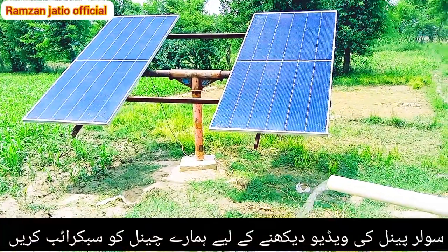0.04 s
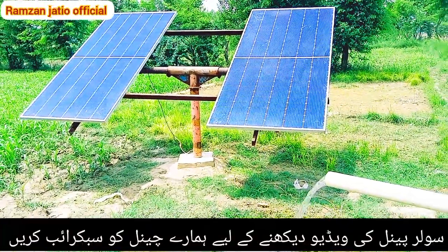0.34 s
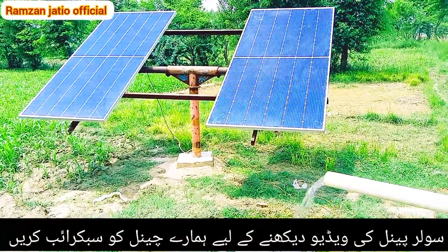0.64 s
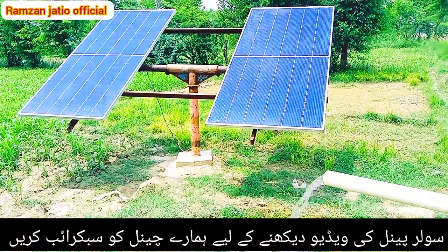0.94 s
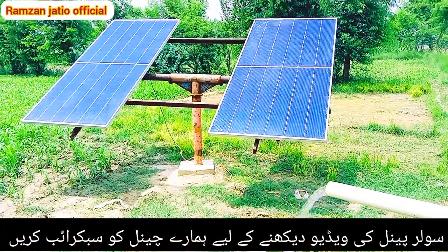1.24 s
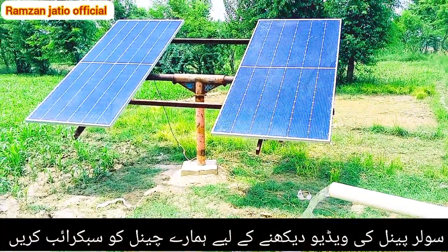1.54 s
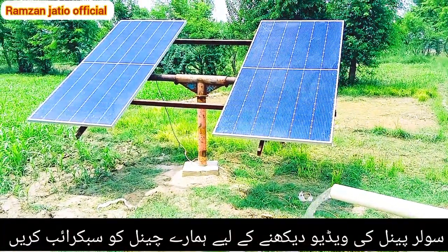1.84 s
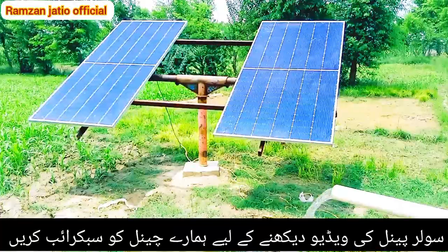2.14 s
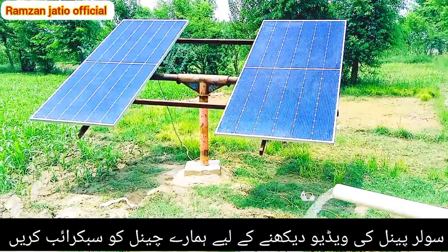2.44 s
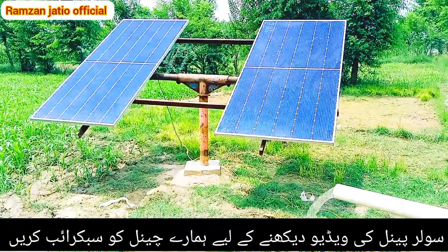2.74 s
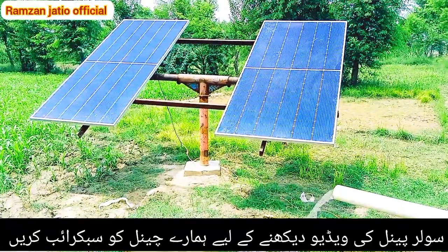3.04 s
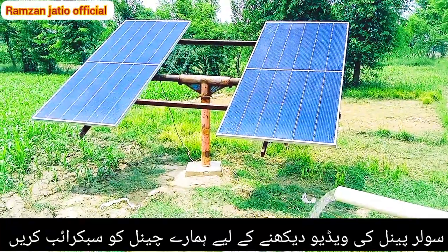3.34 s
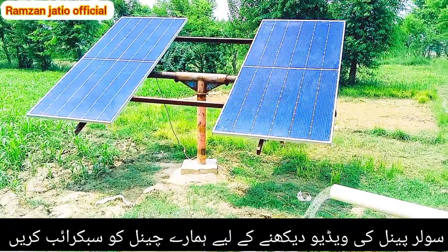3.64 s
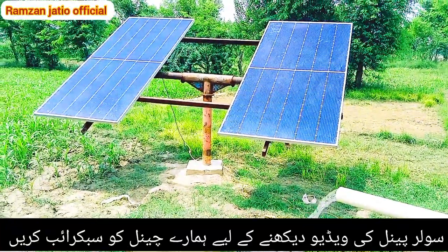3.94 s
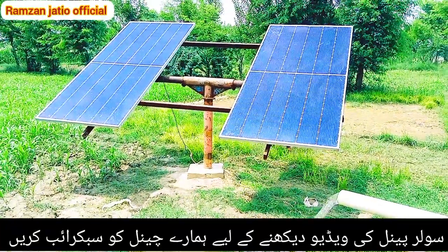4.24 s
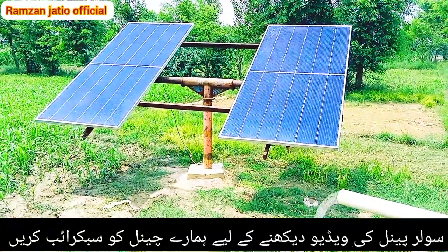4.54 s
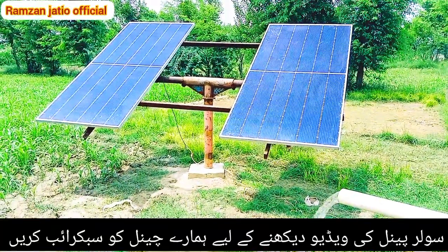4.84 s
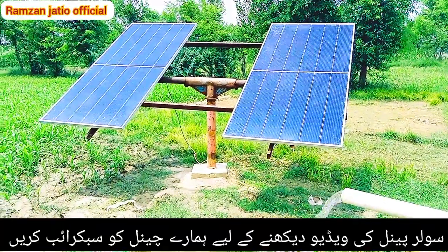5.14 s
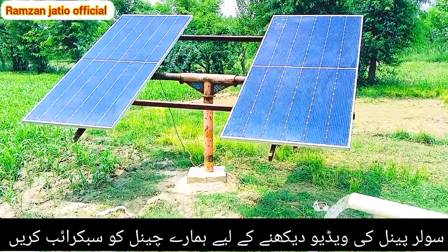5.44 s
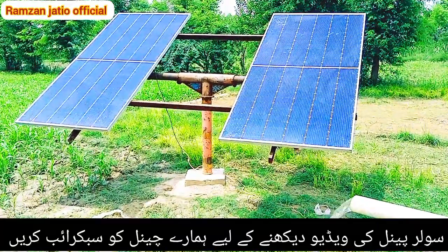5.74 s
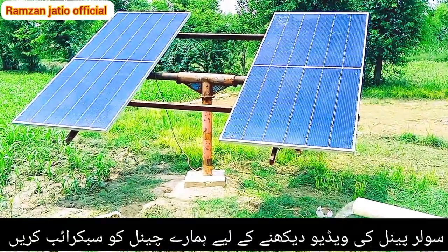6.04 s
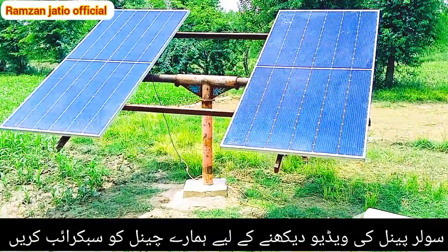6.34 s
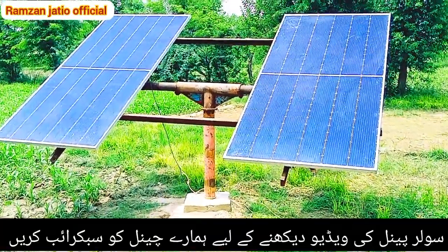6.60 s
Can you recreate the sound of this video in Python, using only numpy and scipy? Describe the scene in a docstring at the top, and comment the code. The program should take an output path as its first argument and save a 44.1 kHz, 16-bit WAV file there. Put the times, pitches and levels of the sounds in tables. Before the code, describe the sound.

A close jet of water pours from a pipe outdoors, fizzing, splashing and gurgling, with a single light knock early on.

```python
"""Water gushes from a pump pipe into a channel, close up in an open field: a bright, surging splash.
Spray and drops fizz on top while the jet drags air under, where it gurgles, plops and once glugs.
Lumps of water slap down, and there is one light knock. Reflections hollow out the water's tone and
shift as the hand-held microphone moves. Soft low thumps come from wind and a few deep gulps of water."""
import sys
import numpy as np
from scipy import signal
from scipy.fft import rfft, irfft, next_fast_len
from scipy.io import wavfile
from scipy.ndimage import uniform_filter1d

SR = 44100
rng = np.random.default_rng(int(sys.argv[2]) if len(sys.argv) > 2 else 0)


def file_out(sig):
    """Save sig as 16-bit WAV at sys.argv[1]."""
    # one column per channel
    cols = np.atleast_2d(sig).T
    # limit, then scale
    lim = np.clip(cols, -1, 1)
    pcm = np.round(lim * 32767).astype(np.int16)
    wavfile.write(sys.argv[1], SR, pcm)


N = 298557
T = np.arange(N) / SR

# Tone of the open air. Each row: frequency in Hz, relative level in dB.
AIR_SPECTRUM = [(15, -43), (80, -25.5), (160, -2), (260, 1), (400, -4), (1500, -29), (8000, -51)]
# Tone of the low rumble. Each row: frequency in Hz, relative level in dB.
RUMBLE_SPECTRUM = [(15, -10), (40, -6.5), (75, 2), (130, 0), (220, -11), (400, -28), (1000, -78)]
# Soft low thumps, from wind on the microphone and a few faint deep gulps of water.
# Each row: centre in seconds, level in dB, pitch in Hz, half length in seconds.
LOW_THUMPS = [(0.045, -48, 75.5, 0.029), (0.295, -38.5, 93.8, 0.022), (0.47, -60, 112, 0.019),
              (0.56, -47.5, 74.6, 0.029), (0.67, -60.5, 66, 0.05), (1.01, -60.5, 254, 0.011),
              (1.157, -52.5, 76.4, 0.016), (1.715, -65, 85, 0.072), (4.43, -68, 183, 0.038),
              (5.52, -58.5, 145, 0.0091), (6.057, -65, 171, 0.061), (6.478, -58, 70.7, 0.018),
              (6.725, -63, 150, 0.013)]
# The knock's ring. Each row: frequency in Hz, relative level in dB, seconds to fall by 60 dB.
KNOCK_RING = [(1670, -21, 0.023), (3130, -20, .01), (4050, -11, 0.014), (6000, 0, 0.0093),
              (6850, 4.5, 0.0065), (7270, -9, 0.013), (11750, -4, .008), (12450, -4, 0.011),
              (13370, -5, .007), (14700, -8, .008)]
# Tone of the water at the microphone. Each row: frequency in Hz, relative level in dB.
WATER_EQ = [(200, -20.5), (380, -9), (540, -9), (1100, -12), (1600, -10), (3500, -9), (4400, -12),
            (5600, -2), (6500, 1), (7300, -6.5), (8500, -18.5), (10500, -21.5), (12200, -8), (14000, -15),
            (15300, -11)]
# Notches cut by reflections at each microphone position. Each row: centre in Hz, width in Hz, gain in dB.
FIRST_NOTCHES = [(348, 129, -11), (825, 120, -5.5), (1370, 150, -8.5), (1892, 106, -19.5),
                 (2410, 143, -8.5), (2870, 170, -3.5), (4900, 250, -10)]
SECOND_NOTCHES = [(355, 127, -9), (907, 100, -8.5), (1398, 165, -11.5), (1888, 86, -8), (2480, 97, -9),
                  (2755, 108, -12), (4017, 260, -7.5)]
# The microphone's move. Each row: time in seconds, share of the way to the second position.
MIC_MOVE = [(3.6, 0.039), (4.1, 1)]
# Lumps of water landing. Each row: start in seconds, relative level in dB, length in seconds.
WATER_SLAPS = [(1.049, -37, 0.0013), (1.05, -36, 0.0078), (1.851, -34.5, 0.0017), (2.365, -46, 0.0035),
               (3.557, -34.5, 0.0016), (4.058, -36, 0.002), (4.145, -35.5, 0.0021), (4.892, -33.5, 0.0025),
               (5.176, -36, 0.005), (5.209, -33.5, 0.002), (5.233, -35, 0.0058), (5.276, -35, 0.0045),
               (5.285, -35, 0.003), (5.551, -41, .001), (5.6118, -31, 0.0012), (6.027, -34.5, 0.0057),
               (6.059, -35.5, 0.005), (6.062, -46, 0.0025)]
# Big lone bubbles, plus two dull lumps of water landing (1.651 and 2.249 s), made as very short bubbles. Each
# row: start in seconds, relative level in dB, pitch in Hz, decay time in cycles.
BUBBLE_PLOPS = [(.081, -34.5, 1040, 6), (.143, -40, 675, 6.6), (0.691, -38.5, 980, 6.7),
                (1.651, -37, 1090, 2.1), (1.715, -44.5, 526, 3.7), (1.82, -34, 2780, 5),
                (2.249, -32, 1170, 3.2), (2.682, -46, 580, 4.5), (2.73, -45, 635, 4.6),
                (2.802, -39.5, 1050, 6.9), (3.158, -42.5, 1010, 6), (3.939, -44, 714, 5),
                (4.294, -40, 1150, 5.6), (5.689, -37.5, 1020, 5.8), (5.716, -30.5, 997, 6.1)]
# One shrinking air pocket. Each row: time in seconds, level in dB, pitch in Hz.
GLUG_SWEEP = [(2.535, -84, 400), (2.555, -66, 427), (2.595, -55.5, 497), (2.65, -60.5, 724),
              (2.69, -55, 880), (2.8, -63, 960), (2.83, -80, 1100)]
# Resonances of the hollow that the jet digs. Each row: centre in Hz, width in Hz.
HOLLOW_MODES = [(585, 47), (684, 22.5), (1050, 38)]
# Big gulps of air. Each row: start and length in seconds, relative deep and high gurgle levels in dB.
AIR_GULPS = [(0.107, 0.1, -56, -65), (0.566, 0.11, -57, -59), (0.751, 0.071, -53.5, -69),
             (.84, 0.069, -62, -52.5), (0.937, 0.049, -54, -65), (1.15, 0.045, -54.5, -62),
             (1.266, 0.21, -68, -64), (1.587, .14, -55.5, -77), (1.732, 0.047, -69, -57.5),
             (1.928, 0.2, -58.5, -56.5), (2.143, .14, -67, -56), (2.416, 0.062, -60, -58),
             (2.638, 0.12, -56.5, -64), (2.84, 0.077, -56, -63), (3.07, 0.1, -59.5, -65),
             (3.316, 0.067, -59.5, -74), (3.427, .1, -68, -61), (3.7, 0.13, -56.5, -70),
             (3.823, 0.059, -60, -51.5), (3.93, 0.08, -53.5, -60), (4.266, 0.17, -58.5, -74),
             (4.542, 0.14, -54.5, -58.5), (4.7, 0.23, -67, -60), (4.983, 0.17, -57, -64),
             (5.166, 0.091, -56, -61), (5.394, 0.15, -59, -58), (5.583, 0.23, -55.5, -61),
             (5.85, 0.055, -55, -53), (6.01, .06, -61, -77), (6.19, 0.081, -54, -58),
             (6.41, 0.074, -77, -60), (6.49, 0.048, -55, -80)]
# Lulls in the bubbling. Each row: centre and half length in seconds, dip of the deep simmer in dB.
SIMMER_STALLS = [(1.547, 0.062, -13), (3.002, 0.024, -18), (3.24, .04, -20)]
# Slow drift of the jet. Each row: time in seconds, level in dB above its usual strength.
JET_DRIFT = [(0, -0.1), (.5, -0.65), (.88, .6), (1.13, -0.3), (1.9, -0.65), (2.5, 0), (3.62, 0), (3.8, 1),
             (4.2, 0.7), (5.2, 0.23), (6.45, 0.5), (6.77, -0.8)]
# Brief spurts and sags of the jet. Each row: centre and half length in seconds, level change in dB.
JET_SPURTS = [(.88, .03, 2), (1.051, .012, 3.5), (1.476, 0.029, -3.5), (1.546, 0.034, -3),
              (1.645, 0.021, 2.5), (2.075, 0.03, 1.9), (2.14, .02, -3), (2.192, 0.018, 2.2),
              (2.245, 0.011, 3), (2.32, 0.028, -1), (2.717, 0.023, 3), (3.88, .025, 2), (5.347, .02, -2.2),
              (5.513, 0.017, 2.5), (6.364, .035, -3), (6.454, .035, 1.4)]

AIR_DB, RUMBLE_DB = -81.5, -85
WAKE_DB, WAKE_LENGTHS = -18, 2.2  # each thump comes with a weaker, longer rumble
KNOCK_S, KNOCK_DB = 1.5059, -22
SIMMER_DEEP_DB, SIMMER_HIGH_DB, SIMMER_WAVER_DB = -61.5, -63, 3  # on the same scale as the gulps
GULP_RISE_S, GULP_FADE_S = .02, .018
SPLASH_DB, PATTER_DB = -45, -54  # at the jet's usual strength
PATTER_FOLLOWS = 1.6  # dB of patter per dB of the jet
HIGH_CUT_HZ = 15580


def gain_of(db):
    """Decibels to gain."""
    return 10 ** (np.asarray(db) / 20)


def unit_rms(x):
    """Scales to rms 1."""
    return x / np.sqrt(np.mean(x ** 2) + 1e-20)


def steadied(x):
    """A leveller: evens out swings slower than about 40 ms."""
    x = unit_rms(x)
    power = uniform_filter1d(uniform_filter1d(x ** 2, size=1500), size=1000)
    return unit_rms(x / np.sqrt(abs(power) + 0.19))


def eq_db(points, hz):
    """An EQ curve in dB, its points joined on a log-frequency axis."""
    point_hz, db = np.transpose(points)
    return np.interp(np.log(hz + 1), np.log(point_hz), db)


def automation(rows, column=1):
    """One column of a timed table, drawn out to every sample."""
    rows = np.array(rows)
    return np.interp(T, rows[:, 0], rows[:, column])


def bump(centre_s, half_length):
    """A bell-shaped envelope."""
    return np.exp(-np.minimum(((T - centre_s) / half_length) ** 2, 50))


def add(mix, start_s, sound):
    """Drops a sound into the mix."""
    part = mix[max(round(start_s * SR), 0):][:len(sound)]
    part += sound[:len(part)]


def band(x, lo_hz, hi_hz, order=3):
    """Band-pass."""
    sos = signal.butter(order, [lo_hz, min(hi_hz, .49 * SR)], "band", fs=SR, output="sos")
    return signal.sosfilt(sos, x)


def resonate(x, hz, width_hz):
    """A resonance of gain 1 at a steady or moving pitch."""
    turn = np.exp(2j * np.pi * np.cumsum(hz * np.ones(N)) / SR)
    pole = np.exp(-np.pi * width_hz / SR)
    return 2 * (turn * signal.lfilter([1 - pole], [1, -pole], x / turn)).real


def noise(spectrum):
    """Noise of rms 1 with the given spectrum."""
    size = next_fast_len(N)
    gains = gain_of(eq_db(spectrum, np.fft.rfftfreq(size, 1 / SR)))
    return unit_rms(irfft(rfft(rng.standard_normal(size)) * gains, size)[:N])


def flutter(lo_hz, hi_hz):
    """Soft-clipped random wavering of rms 1 between two rates."""
    sos = signal.butter(2, [lo_hz, hi_hz], "band", fs=1000, output="sos")
    slow = signal.sosfilt(sos, rng.standard_normal(8000))
    waver = np.interp(T, np.arange(8000) / 1000 - 1, slow)  # a second of pre-roll settles the filter
    return unit_rms(np.tanh(unit_rms(waver) / 2))


def impacts(per_s, spread_db):
    """Random clicks: many small, a few large."""
    size = gain_of(spread_db * np.minimum(rng.exponential(1, N), 4))
    return unit_rms(size * rng.choice([-1, 1], N) * (rng.random(N) < per_s / SR))


def low_end():
    """Wind on the microphone and a few deep water gulps thump and rumble over a bed of open air."""
    thumps = np.zeros(N)
    rumble_gain = gain_of(RUMBLE_DB + 3.8 * flutter(3.9, 7))
    turbulence = steadied(band(noise(RUMBLE_SPECTRUM), 35, 135)) / 4
    for centre, db, hz, half_length in LOW_THUMPS:
        tone = np.sin(2 * np.pi * (hz * T + rng.random()))
        thumps += gain_of(db) * bump(centre, half_length) * (tone + turbulence)
        rumble_gain += gain_of(db + WAKE_DB) * bump(centre, WAKE_LENGTHS * half_length)
    rumble = rumble_gain * noise(RUMBLE_SPECTRUM)
    air = noise(AIR_SPECTRUM) * gain_of(AIR_DB + 4.7 * flutter(4.9, 12.8))
    return thumps + rumble + air


def knock():
    """One light, hard knock: a broad crack and a ring that dies within milliseconds."""
    t, out = np.arange(SR // 10) / SR, np.zeros(N)
    ring = sum(gain_of(db - 60 * t / t60) * np.sin(2 * np.pi * (hz * t + rng.random()))
               for hz, db, t60 in KNOCK_RING)
    crack = band(rng.choice([-1., 1.], len(t)), 1400, 7500) * np.exp(-t / .002)
    hit = (ring + crack / 2) * (1 - np.exp(-t / .0004))
    add(out, KNOCK_S, gain_of(KNOCK_DB) * hit / abs(hit).max())
    return out


def reflections(notches, size=4096):
    """Impulse response from the water to one microphone position, notched by reflections."""
    hz = np.fft.rfftfreq(size, 1 / SR)
    notch_db = sum(depth * np.exp(-((hz - centre) / width) ** 2) for centre, width, depth in notches)
    db = eq_db(WATER_EQ, hz) + notch_db
    log_gain = np.log(gain_of(np.r_[db, db[-2:0:-1]]))
    minimum_phase = np.exp(np.conj(signal.hilbert(log_gain)))
    taps = np.fft.ifft(minimum_phase).real[:size // 2]
    return taps / np.linalg.norm(taps)


def at_mic(x):
    """The microphone moves, crossfading the water from one set of reflections to the other."""
    first = signal.oaconvolve(x, reflections(FIRST_NOTCHES))[:N]
    second = signal.oaconvolve(x, reflections(SECOND_NOTCHES))[:N]
    return first + automation(MIC_MOVE) * (second - first)


def slaps():
    """Each lump of water lands as a brief burst of impacts."""
    out = np.zeros(N)
    for start, db, length in WATER_SLAPS:
        age = np.arange(2000) / SR / length
        envelope = (1 - np.exp(-age / 0.21)) * np.exp(-age ** 2)  # attack: a fifth of the length
        add(out, start, gain_of(db) * envelope * rng.choice([-1, 1], len(age)))
    return gain_of(2.5) * at_mic(band(out, 1050, 15000, order=1))


def bubble(hz, cycles, rise):
    """A pocket of air rings down, its pitch rising as it nears the surface."""
    age = np.arange(int(6 * cycles / hz * SR) + 2) / SR * hz / cycles  # in decay times
    envelope = (1 - np.exp(-2 * age * cycles)) * np.exp(-age)
    return envelope * np.sin(2 * np.pi * cycles * (age + rise * age ** 2 / 2))


def swarm(lo_hz, hi_hz, per_s, spread_db, cycles, rise, sizes=12):
    """Bubbles of many sizes, each size born at its own random moments."""
    out = np.zeros(N)
    for hz in np.geomspace(lo_hz, hi_hz, sizes):
        births = impacts(per_s / sizes, spread_db)
        out += np.sqrt(hz) * unit_rms(signal.oaconvolve(births, bubble(hz, cycles, rise))[:N])
    return unit_rms(out)


def plops():
    """Now and then one large bubble rings out above the rest, and twice a dull lump of water lands with a
    short, broad thud."""
    out = np.zeros(N)
    for start, db, hz, cycles in BUBBLE_PLOPS:
        add(out, start, gain_of(db) * bubble(hz, cycles, rise=0.027))
    return at_mic(out)


def glug():
    """Impacts ring an air pocket whose pitch climbs as it shrinks."""
    pitch_hz = automation(GLUG_SWEEP, column=2)
    pocket = steadied(resonate(impacts(per_s=900, spread_db=2.5), pitch_hz, width_hz=80))
    gate = (T > GLUG_SWEEP[0][0]) & (T < GLUG_SWEEP[-1][0])
    return gate * gain_of(automation(GLUG_SWEEP)) * band(pocket, 320, 1900)


def gulping():
    """Envelopes of the deep and high gurgle: big gulps over a restless simmer that sometimes stalls."""
    stall_db = sum(db * bump(centre, half_length) for centre, half_length, db in SIMMER_STALLS)
    deep_power = gain_of(SIMMER_DEEP_DB + stall_db + SIMMER_WAVER_DB * flutter(2.75, 12)) ** 2
    high_power = gain_of(SIMMER_HIGH_DB + 0.23 * stall_db + SIMMER_WAVER_DB * flutter(1.5, 8.9)) ** 2
    for start, length, deep_db, high_db in AIR_GULPS:
        age = T - start
        attack = np.clip(age / GULP_RISE_S + .5, 0, 1)
        release = np.exp(-np.maximum(age - length, 0) / GULP_FADE_S)
        deep_power += (gain_of(deep_db) * attack * release) ** 2
        high_power += (gain_of(high_db) * attack * release) ** 2
    return np.sqrt(deep_power), np.sqrt(high_power)


def gurgle(surge):
    """The jet drags air under in gulps: short-lived bubbles ring, and so does the hollow in the water."""
    wander = 1 + 0.038 * flutter(2.3, 7.9)  # the hollow keeps changing shape, bending its pitches
    low, middle, top = (unit_rms(resonate(impacts(per_s=150, spread_db=1.5), hz * wander, width))
                        for hz, width in HOLLOW_MODES)
    large = swarm(480.6, 837, per_s=90, spread_db=2.0, cycles=8.7, rise=0.036)
    small = swarm(890.6, 1343, per_s=90, spread_db=1.5, cycles=16.2, rise=0.043)
    tilt_db = 4 * flutter(3.8, 8.3)  # the two lower resonances trade the lead
    ring = gain_of(tilt_db) * low + gain_of(-tilt_db) * middle
    deep_gain, high_gain = gulping()
    deep = deep_gain * steadied(at_mic(band(large + gain_of(-4) * ring, 310, 1260, order=2)))
    high = high_gain * steadied(at_mic(band(small + gain_of(-2.5) * top, 670, 2100, order=2)))
    return (deep + high) * gain_of(0.18 * surge + 1.1 * flutter(5.5, 11.7) - 3.9)


def jet_db():
    """Strength of the jet: a slow drift with brief spurts and sags."""
    spurts = sum(db * bump(centre, half_length) for centre, half_length, db in JET_SPURTS)
    return automation(JET_DRIFT) + spurts


def shatter(per_s, spread_db, decay_s):
    """Drops shatter, each a sudden hiss that dies away."""
    power = signal.lfilter([1], [1, -np.exp(-1 / (decay_s * SR))], impacts(per_s, spread_db) ** 2)
    return unit_rms(np.sqrt(power) * rng.standard_normal(N))


def patter(surge):
    """The midrange: coarse drops smack the surface and trap bubbles, over a smooth rush."""
    drops = shatter(per_s=600, spread_db=2.5, decay_s=0.0016)
    rush = gain_of(-1.5) * rng.standard_normal(N)
    bubbles = gain_of(-6.5) * swarm(1406.4, 4348, per_s=900, spread_db=1.8, cycles=20, rise=0.02, sizes=24)
    blips = gain_of(-12) * swarm(1205, 2420, per_s=50, spread_db=2.5, cycles=7.5, rise=0.027)
    water = band(drops + rush + bubbles + blips, 1177, 4440, order=5)
    water *= gain_of(0.92 * surge + 0.95 * flutter(3.3, 23))
    return gain_of(PATTER_DB + PATTER_FOLLOWS * jet_db()) * unit_rms(at_mic(water))


def splash(surge):
    """The bright top: fine spray, shattering drops and tiny fizzing bubbles, all arriving in clumps."""
    spray = gain_of(6.5) * rng.standard_normal(N)
    drops = shatter(per_s=440, spread_db=4.5, decay_s=0.0011)
    fizz = gain_of(-5.5) * swarm(4577, 8075, per_s=1500, spread_db=2.5, cycles=15, rise=0.0056)
    mist = band(shatter(per_s=80, spread_db=3.5, decay_s=0.0011), 8240, SR / 2)
    mist *= gain_of(2.7 * flutter(1.95, 7.9) - 0.5)
    water = band(spray + drops + fizz + mist, 4020, 21200)
    water *= gain_of(1.06 * surge + 0.5 * flutter(41, 430))
    return gain_of(SPLASH_DB + jet_db()) * unit_rms(at_mic(water))


def scene():
    """The mono mix. The jet breaks into lumps, so splash, patter and gurgle surge together."""
    surge = flutter(3.2, 36)
    water = splash(surge) + patter(surge) + gurgle(surge) + glug() + plops() + slaps()
    return (water + knock() + low_end())[None]


def record(dry):
    """A steep high cut trims the very top of the spray."""
    high_cut = signal.firwin(1023, HIGH_CUT_HZ, window=("kaiser", 8), fs=SR)
    return signal.oaconvolve(dry, high_cut[None], "same")


dry = scene()
out = record(dry)
file_out(out)
```